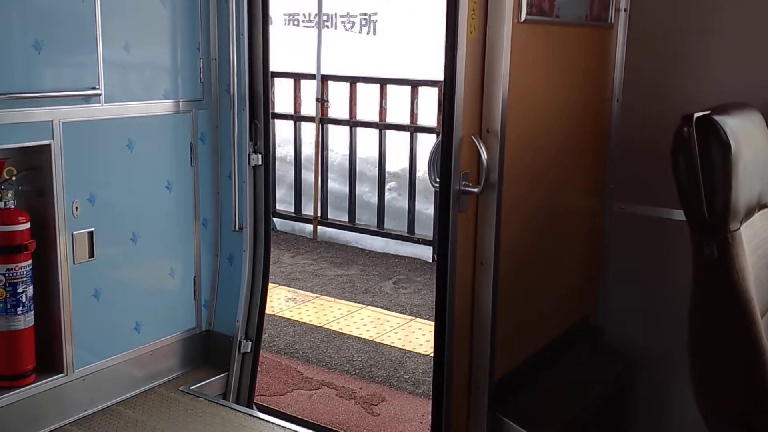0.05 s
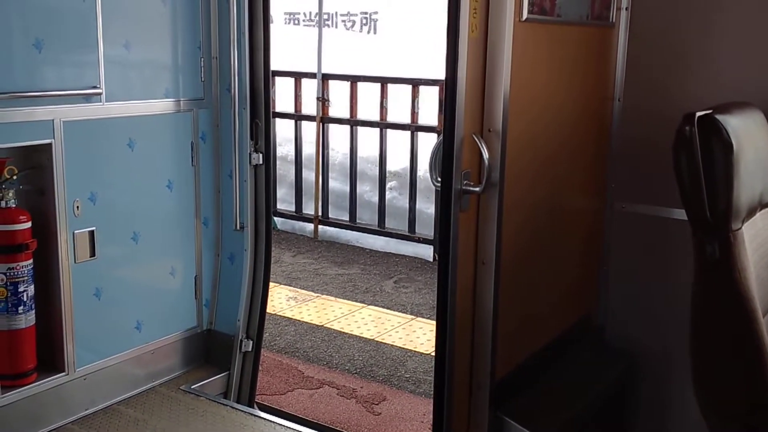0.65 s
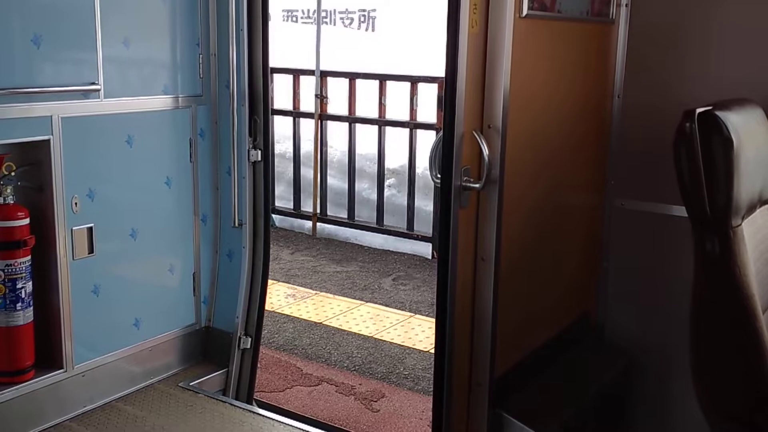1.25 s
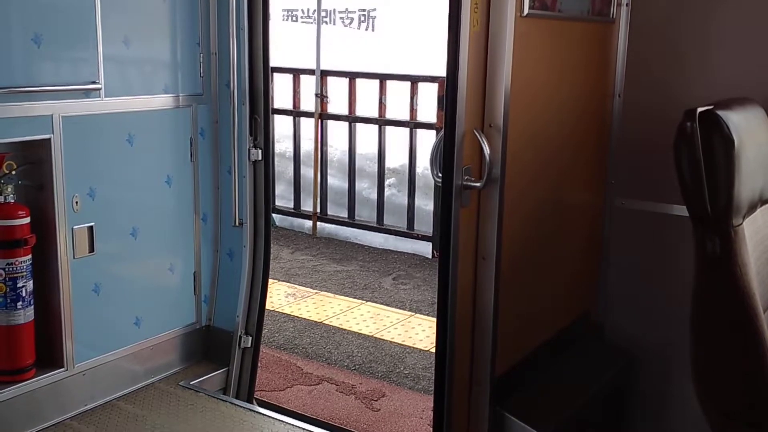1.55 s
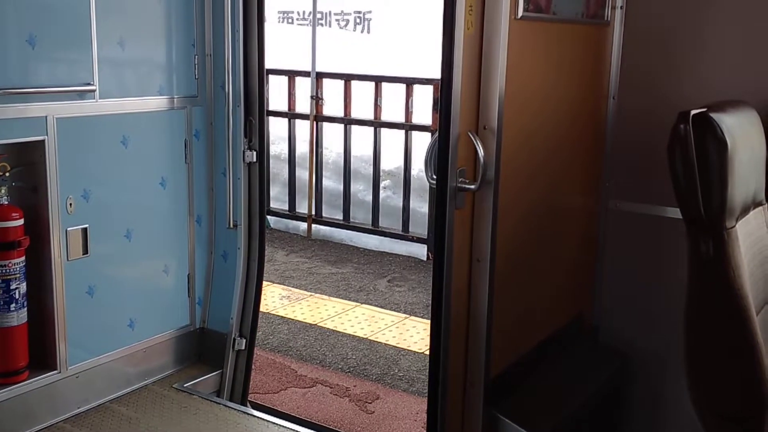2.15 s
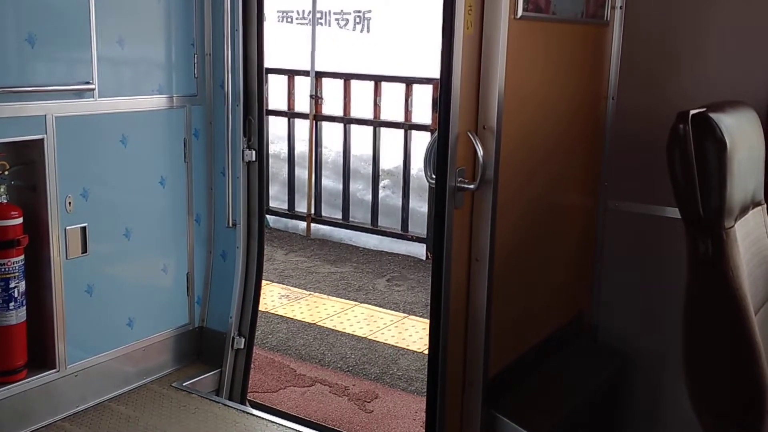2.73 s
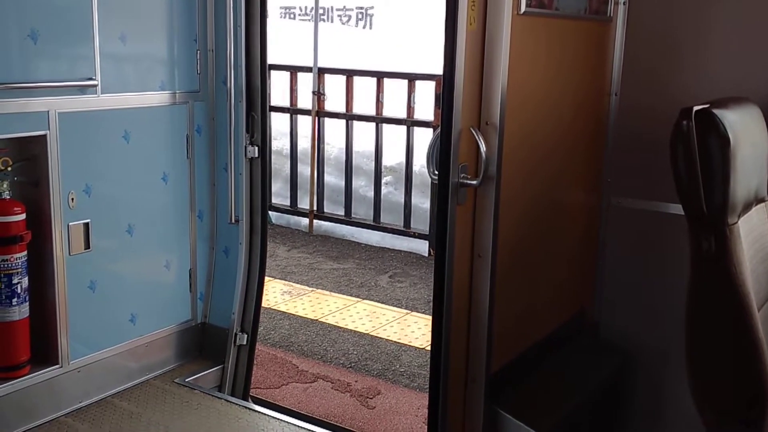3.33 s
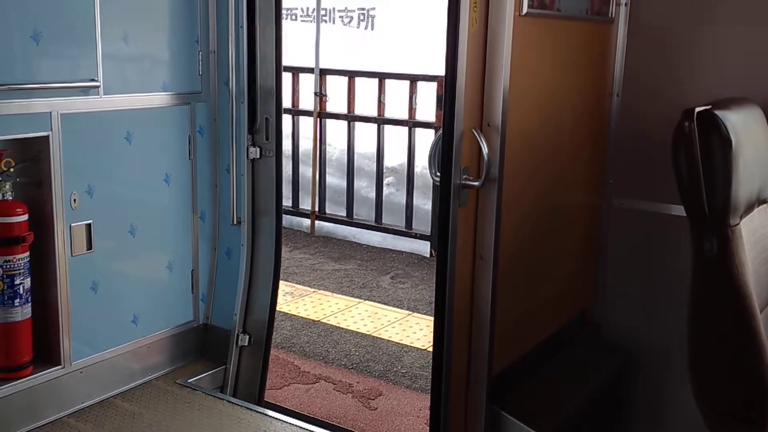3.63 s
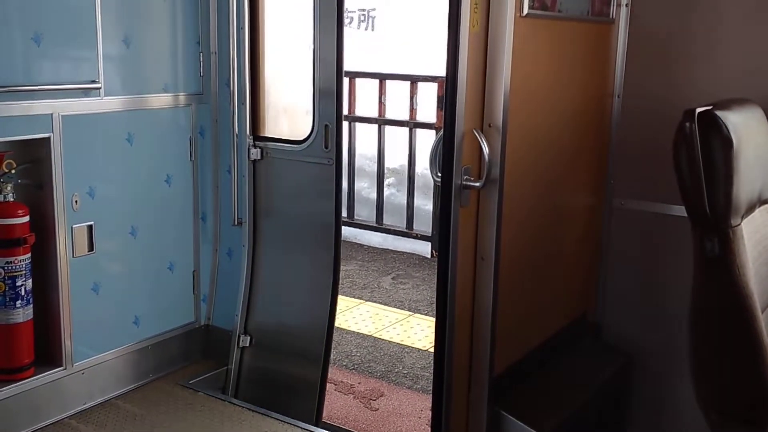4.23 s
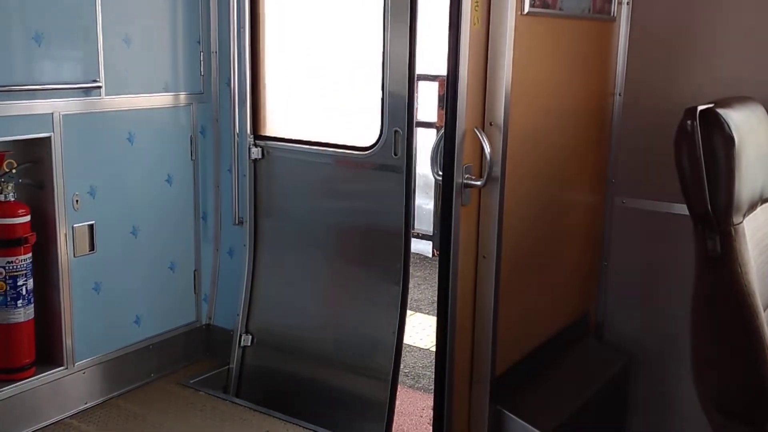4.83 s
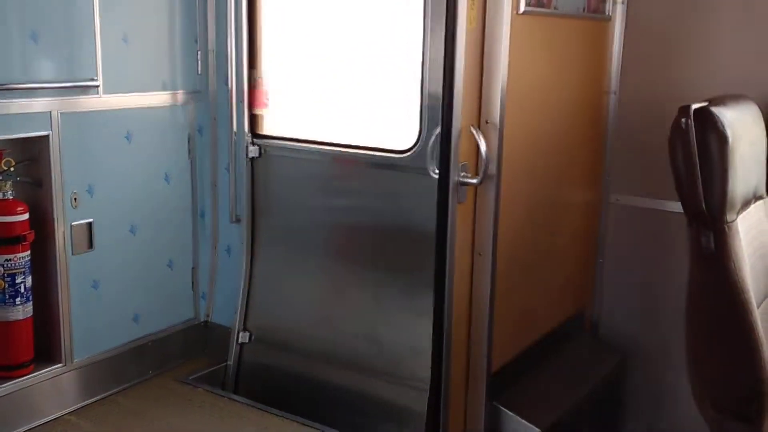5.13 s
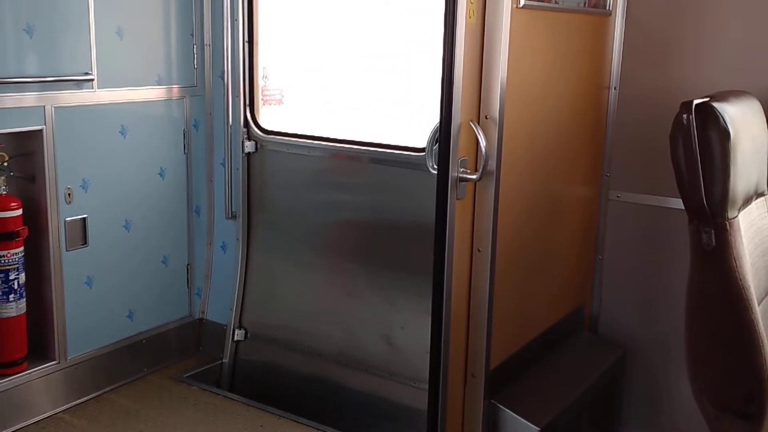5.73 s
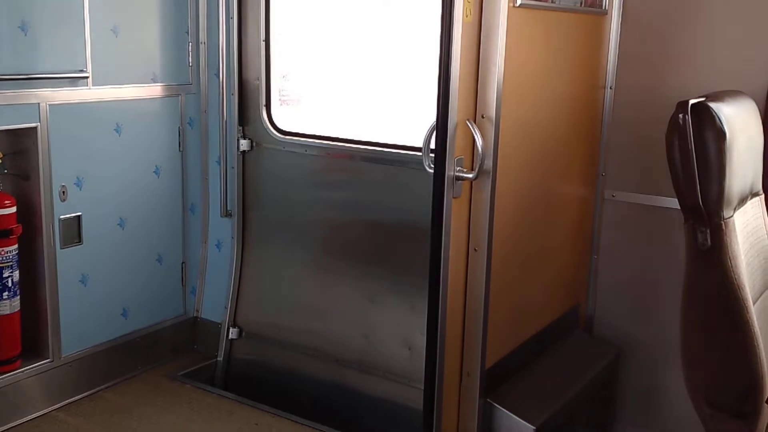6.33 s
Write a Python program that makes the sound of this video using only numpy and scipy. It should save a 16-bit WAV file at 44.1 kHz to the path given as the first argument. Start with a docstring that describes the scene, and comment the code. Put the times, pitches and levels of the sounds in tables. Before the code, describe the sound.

A pneumatic train door closes, heard from just inside the carriage. At first there is only quiet ventilation and a pulsing electrical hum. Then a valve opens with a sudden, strong hiss, and the door rolls and rattles shut, landing with a thump and a brief boom. The hiss stops, leaving air seeping with a faint whistle, a soft rub of rubber, machinery swelling under the floor and one small puff.

```python
"""A turbulent jet of exhaust air hisses loudly as a pneumatic sliding door closes in a standing train.
The valve rings as it opens; the leaf rolls along its track and thuds into its rubber seal, each blow
exciting its bending modes. The jet dies, the carriage body booms, a thin leak sings at the resonances
of the pipes, the seal rubs, machinery surges and a second valve puffs. A beating generator hum and
ventilation lie beneath."""
import sys
import numpy as np
from scipy import signal
from scipy.fft import rfft, irfft
from scipy.io import wavfile
from scipy.ndimage import uniform_filter1d

SR = 44100
rng = np.random.default_rng(int(sys.argv[2]) if len(sys.argv) > 2 else 0)


def to_wav(s):
    """Save 16-bit WAV."""
    ch = np.atleast_2d(s).T  # columns
    pcm = np.round(np.clip(ch, -1, 1) * 32767)  # PCM
    wavfile.write(sys.argv[1], SR, pcm.astype(np.int16))


N = 281358
T = np.arange(N) / SR
F = np.maximum(np.arange(N // 2 + 1) * SR / N, 1)
VALVE_S, START_S, SHUT_S = 3.152, 3.79, 5.285  # the valve opens, the leaf sets off, the leaf lands
SPEED_UP_S, STOP_S = 0.3, 0.022  # time constants of the leaf's motion

# Spectrum of the jet: frequency_hz, level_db
JET_SPECTRUM = [(40, -58), (200, -35), (500, -46), (1000, -14), (1500, -7), (2000, 1.5), (4000, -1.5),
                (8000, -1), (15500, -1)]
# Peaks and dips of the valve housing: centre_hz, width_hz, left_db, right_db
HOUSING_BANDS = [(2123, 126, 0, 5.5), (2413, 380, -1.5, 7), (2630, 120, -3, -1.5), (3590, 270, 0.5, 2.5),
                 (4820, 180, 3.5, 1.5), (5060, 130, -8, -28), (5834, 970, 7, 7.5), (6940, 1300, 5.5, 4.5),
                 (8250, 470, -1.5, 6.5), (8700, 630, -2, -1.5), (9300, 830, 10.5, -1.5),
                 (10370, 1580, -12.5, 2.5), (11600, 900, 6, 7), (13160, 1520, -4, 6),
                 (13750.0, 300.0, 8, 0)]
# Narrow resonances of the exhaust pipe: centre_hz, width_hz, gain_db
EXHAUST_MODES = [(1783, 25, -1), (2002, 25, -1), (2338, 40, 0), (5875, 45, 0), (6238, 35, 1),
                 (6574, 45, -1), (6739, 35, 0), (11627, 55, -1), (12028, 55, 1), (12515, 45, 1),
                 (13338, 60, 1)]


def exhaust():
    """Turbulent jet noise, filtered by housing and pipe, lasts until the cylinder is empty."""
    flow_db, empty_s = -23, 5.283
    dull_db, bright_db, treble_loss_db_per_s = -3, 2, 116
    housing_db = sum(np.outer([left, right], 2 ** -((2 * (F - hz) / width) ** 2))
                     for hz, width, left, right in HOUSING_BANDS)
    pipe = np.hypot(1, resonances(EXHAUST_MODES))
    spectrum = colour(JET_SPECTRUM) * undb(housing_db) * pipe * walls(share=0.48, longest_s=0.024)
    jet = sliding_echo(diffuse_noise(spectrum), share=0.3)
    body = irfft(rfft(jet) / (1 + (F / 9000) ** 8), N)
    age = since(VALVE_S)
    # The top treble brightens as the flow builds and is the first to go.
    treble_db = bright_db + (dull_db - bright_db) * np.exp(-age / 0.24)
    treble = (jet - body) * undb(treble_db - treble_loss_db_per_s * since(SHUT_S))
    spit = 1 + 0.65 * np.exp(-age / 0.044)
    opening = 1 - np.exp(-2 * (age / 0.0078) ** 2)
    flow = opening * np.exp(-since(empty_s) / 0.064)
    push_db = 0.3 * leaf_speed()  # the travelling piston drives the air a little harder
    return (body * spit + treble) * flow * undb(flow_db + push_db + 0.25 * walk(24.36))


def sliding_echo(sound, share):
    """Comb filtering: the path reflected off the closing leaf shortens, so the notches move upward."""
    lag_s = np.interp(T, [START_S, SHUT_S], [0.0049, 0.0031])
    echo = np.array([np.interp(np.round((T - lag_s) * SR), np.arange(N), ear) for ear in sound])
    return (sound + share * echo) / np.hypot(1, share)


# Modes of the valve body, for each of two filter passes: centre_hz, width_hz, gain_db
VALVE_MODES = [(2470, 150, -1), (6400, 900, -9), (9100, 500, -2)]


def valve():
    """Transient excitation: the first rush of air briefly rings the valve body."""
    ring = diffuse_noise(resonances(VALVE_MODES) ** 2, pan_db=2)
    return ring * undb(-26) * ramp(VALVE_S, 0.006) * np.exp(-since(VALVE_S) / 0.041)


# Bending modes of the leaf: centre_hz, width_hz, gain_db
LEAF_MODES = [(205.4, 29, 2.5), (274.4, 11, 5), (336, 18, 5), (400.7, 16, 2.5), (452, 11, 5.5),
              (562, 5, 1.5), (628, 45, -9), (744, 29, -5), (855, 15, -5), (940, 65, -12.5),
              (1108, 43, -7.5), (1560, 10, -5), (1870, 18, -2)]
# Spectrum of a blow on the leaf: frequency_hz, level_db
BLOW_SPECTRUM = [(40, -28), (130, -19), (230, 0), (450, -3.5), (800, -0.5), (1200, -7), (2000, -12.5),
                 (3500, -15), (7000, -49), (15000, -54)]
# Blows on the leaf: start_s, level_db, rise_s, t60_s, tilt_db_per_octave
BLOWS = [(3.153, -43, 0.008, 0.39, 2.5), (3.354, -38.5, 0.014, 0.61, 6.5), (3.828, -41.5, 0.018, 0.52, 3),
         (4.02, -34, .012, 0.19, -0.5), (4.215, -33, .015, .25, -2.5), (4.300, -33.5, .005, 0.33, 1),
         (4.375, -29, 0.0071, 0.11, -12), (5.125, -25, 0.03, 0.27, 1.5), (5.27, -21.5, 0.009, 0.15, 3.5),
         (5.291, -20.5, 0.0053, 0.44, 1.05), (5.501, -37.5, 0.0047, 0.63, 4)]


def knocks():
    """Impacts excite damped modes as the piston takes up slack and the leaf jolts along and lands."""
    ring = colour(BLOW_SPECTRUM) * (resonances(LEAF_MODES) + 0.84)
    octaves = np.log2(np.maximum(F, 150) / 500)
    out = 0
    for start_s, level_db, rise_s, t60_s, tilt in BLOWS:
        decay = ramp(start_s, rise_s) * 1000 ** (-since(start_s + rise_s) / t60_s)
        out = out + undb(level_db) * decay * diffuse_noise(ring * undb(tilt * octaves), pan_db=3)
    return out


# Spectra of the booming leaf and of its rattling fittings: frequency_hz, level_db
RUMBLE_SPECTRUM = [(30, -45), (60, -15), (125, -11), (195, 0.5), (270, 1.5), (330, -8), (430, 2),
                   (520, -18), (900, -43)]
RATTLE_SPECTRUM = [(300, -12), (520, 0), (800, -1), (1120, 1), (1400, 1.5), (1900, -16), (3000, -25),
                   (6000, -50)]


def rolling():
    """Roughness excitation: rollers cross grit and shake the leaf; the noise follows powers of speed."""
    grit = undb(2 * walk(140))
    ring = resonances(LEAF_MODES) + 0.12
    rumble = diffuse_noise(colour(RUMBLE_SPECTRUM) * ring, pan_db=1.5, drive=grit)
    rattle = diffuse_noise(colour(RATTLE_SPECTRUM) * ring, pan_db=2.5, drive=grit)
    return rumble * undb(-34) * leaf_speed() ** 2.45 + rattle * undb(-35.5) * leaf_speed() ** 0.75


def leaf_speed():
    """Exponential relaxation: the leaf nears full speed (1), then stops quickly in its seal."""
    return (1 - np.exp(-since(START_S) / SPEED_UP_S)) * np.exp(-since(SHUT_S) / STOP_S)


# Resonances of the leaking pipes: centre_hz, width_hz, gain_db
LEAK_MODES = [(1580, 80, -2), (2160, 180, 5.5), (2320, 88, 4), (2600, 82, 2), (2990, 52, -1.5),
              (6420, 150, -2.5)]
# Spectrum of the leak's hiss: frequency_hz, level_db
LEAK_SPECTRUM = [(500, -33), (1400, -13), (2400, -8), (3400, -13), (4600, -7.5), (5900, 1), (7000, 2.5),
                 (7700, -6.5), (9300, -7.5), (10100, -16.5), (11200, -8), (13500, -16), (15500, -13)]
# Swells of the whistle: peak_s, half_length_s, relative_level_db
WHISTLE_SWELLS = [(5.75, 0.062, 7.5), (6.15, 0.15, 4), (6.37, 0.072, 5)]


def leak():
    """Pipe resonance: seeping air sings in narrow bands and now and then rises to a thin whistle."""
    whistle_hz, width_hz = 2127, 38
    pipes = resonances(LEAK_MODES) / (1 + (1300 / F) ** 4) / (1 + (F / 8000) ** 6)
    song = diffuse_noise(pipes, pan_db=-6)
    swells = sum(undb(db) * np.exp(-((T - peak_s) / half_s) ** 2)
                 for peak_s, half_s, db in WHISTLE_SWELLS)
    whistle = diffuse_noise(resonances([(whistle_hz, width_hz, 0)]) ** 2, pan_db=-20.5) * swells
    hiss = diffuse_noise(colour(LEAK_SPECTRUM), pan_db=-1)
    surge_db = 4.5 * np.exp(-since(SHUT_S + 0.22) / 0.08)  # strong as the door shuts, then settling
    seep = ramp(SHUT_S, STOP_S) * undb(-48 + surge_db)
    return (song * undb(1.5) + whistle * undb(-2.5) + hiss * undb(-5)) * seep


def seal():
    """Stick-slip friction: the rubber edge rubs once against the frame as it settles."""
    rub = undb(-41) * envelope(start_s=5.8, rise_s=0.045, hold_s=0.045, fade_s=0.072)
    rubber = resonances([(790, 130, -2), (975, 67, -1.5)]) ** 2
    return diffuse_noise(rubber, drive=undb(1.5 * walk(120))) * rub


# Spectrum of the second valve's jet: frequency_hz, level_db
PUFF_SPECTRUM = [(300, -32), (900, -17), (1600, -13), (2200, -3.5), (2800, 1.5), (3200, -9.5), (3800, 0.5),
                 (4300, -11), (5000, -6), (5600, -14), (6400, -11.5), (8200, -14), (9000, -21),
                 (15500, -23)]


def puff():
    """A short burst of jet turbulence escapes from a second valve."""
    flow = undb(-34.5) * envelope(start_s=6.247, rise_s=0.021, hold_s=0.032, fade_s=0.068)
    return diffuse_noise(colour(PUFF_SPECTRUM), pan_db=-5.5) * flow


# Spectrum of the low rumbles: frequency_hz, level_db
LOW_RUMBLE_SPECTRUM = [(30, -28), (65, -12), (120, -18), (180, 4.5), (260, -6), (350, -7.5), (460, -2),
                       (600, -8.5), (950, -7), (1300, -15.5), (1650, -13), (2400, -48)]
# The body boom, then three machinery surges: start_s, rise_s, hold_s, fade_s, level_db
LOW_RUMBLES = [(5.33, .06, .01, .13, -39), (5.62, 0.23, .05, 0.2, -46.5), (6.114, .02, 0.13, .15, -44),
               (6.24, .05, 0.023, 0.078, -40)]


def low_rumbles():
    """Power addition: the carriage body booms after the slam, then machinery surges under the floor."""
    power = sum((undb(db) * envelope(*timing)) ** 2 for *timing, db in LOW_RUMBLES)
    return diffuse_noise(colour(LOW_RUMBLE_SPECTRUM), drive=undb(0.74 * walk(60))) * np.sqrt(power)


# Partials of the generator beside its hum: pitch_hz, base_level_db
GENERATOR_PARTIALS = [(49.6, -78.5), (150.7, -71.5), (198.6, -72), (398, -71.5), (559, -73.5), (899, -75.5),
                      (1087, -68), (1136, -73.5), (1583, -70), (1685, -68), (2239, -87), (3095, -78),
                      (3192, -72), (3275, -82)]


def generator():
    """Beating: two close tones throb under wavering partials; hum and high whine grow with load."""
    hum_hz, beat_hz, in_step_s = 98.9, 0.895, 2.07
    phase = 2 * np.pi * np.cumsum(hum_hz + 0.49 * walk(2.9)) / SR
    load = ramp(start_s=1.25, rise_s=1.45)
    hum = np.sin(phase) + undb(-4.5) * np.sin(phase - 2 * np.pi * beat_hz * (T - in_step_s))
    out = hum * undb(-62.5 + 3.5 * load) * undb([[3], [-5]])  # louder at the left ear
    strain = undb(-4.5 + 6 * load)
    for hz, db in GENERATOR_PARTIALS:
        phase = 2 * np.pi * np.cumsum(hz + (0.62 + hz / 1200) * walk(25.14)) / SR
        ear_phase = rng.uniform(-1, 1) * min(hz / 2000, 0.8) * np.array([[1], [-1]])
        gain = strain ** (hz / 3000) * undb(db + 0.5 + 1.1 * walk(7.9))
        out = out + gain * np.sin(phase + ear_phase)
    return np.sqrt(2) * out


# Spectrum of the background in the vestibule: frequency_hz, level_db
AMBIENT_SPECTRUM = [(25, -20.5), (50, -3.5), (120, -9.5), (260, -6), (550, 1), (1100, -2.5), (1350, -6.5),
                    (2050, -2), (2800, -7.5), (3800, -14.5), (6000, -14), (9500, -23.5), (12000, -23.5),
                    (15500, -27)]


def ambience():
    """A diffuse field of broadband noise comes from the ventilation and the quiet platform."""
    spectrum = colour(AMBIENT_SPECTRUM) * walls(share=0.1, longest_s=0.016)
    return diffuse_noise(spectrum, pan_db=-3) * undb(-56.18 + 0.29 * walk(6.2))


def walls(share, longest_s):
    """Interference: six uneven reflections off close panels comb the spectrum differently at each ear."""
    lags_s = longest_s * np.sqrt([[2, 5, 11, 17, 29, 41], [3, 7, 13, 19, 31, 43]]) / np.sqrt(43)
    reflections = np.exp(-2j * np.pi * lags_s[:, :, None] * F).sum(axis=1)
    return abs(1 + share * reflections / np.sqrt(6))


# How unlike the two ears are: frequency_hz, side_over_mid_db
SIDE_SPECTRUM = [(60, -30), (150, -27), (300, -11.5), (700, -8.5), (1400, 0), (2500, -0.1), (6000, 0)]


def diffuse_noise(gain, pan_db=0, drive=1):
    """Interaural coherence: noise of rms 1, alike at both ears in the bass; drive modulates its force."""
    ear_lag_s = 0.00009  # the door is to the left, so sound reaches that ear first
    mid, side = rfft(rng.standard_normal((2, N)) * drive)
    width = colour(SIDE_SPECTRUM)
    left = mid + side * width
    right = (mid - side * width) * np.exp(-2j * np.pi * F * ear_lag_s)
    ears = np.array([left, right]) / np.hypot(1, width)
    return unit(irfft(ears * gain * undb([[pan_db / 2], [-pan_db / 2]]), N))


def colour(points):
    """Spectral envelope: gain interpolated over log frequency from (frequency_hz, level_db) points."""
    hz, db = np.transpose(points)
    return undb(np.interp(np.log(F), np.log(hz), db))


def resonances(modes):
    """Gain of damped resonators (centre_hz, width_hz, gain_db), summed in power."""
    return np.sqrt(sum(undb(db) ** 2 / (1 + ((F / hz - hz / F) * hz / width) ** 2)
                       for hz, width, db in modes))


def walk(rate_hz):
    """Random modulation: held levels, smoothed twice and scaled to rms 1."""
    hold = int(SR / rate_hz)
    steps = rng.standard_normal(4096)[(T * rate_hz).astype(int)]
    return unit(uniform_filter1d(uniform_filter1d(steps, hold), hold))


def envelope(start_s, rise_s, hold_s, fade_s):
    """Linear attack, hold, exponential decay."""
    return ramp(start_s, rise_s) * np.exp(-since(start_s + rise_s + hold_s) / fade_s)


def ramp(start_s, rise_s):
    """A linear rise from 0 to 1."""
    return np.minimum(since(start_s) / rise_s, 1)


def since(start_s):
    """Seconds elapsed since a moment; zero before it."""
    return np.maximum(T - start_s, 0)


def undb(db):
    """Decibels to amplitude gain."""
    return 10 ** (np.asarray(db) / 20)


def unit(x):
    """Scale to rms 1."""
    return x / np.sqrt(np.mean(x ** 2))


def scene():
    """Superposition: the pressures of all sources in the vestibule add at each ear."""
    door = valve() + exhaust() + rolling() + knocks() + leak() + seal()
    return door + low_rumbles() + puff() + generator() + ambience()


def record(dry):
    """An elliptic low-pass filter cuts the top treble steeply."""
    cutoff_hz = 15700
    return signal.sosfilt(signal.ellip(12, 0.1, 80, cutoff_hz, fs=SR, output="sos"), dry)


dry = scene()
out = record(dry)
to_wav(out)
```